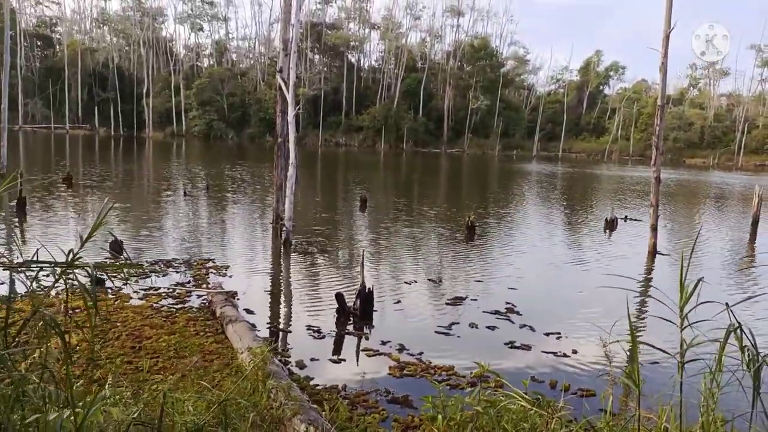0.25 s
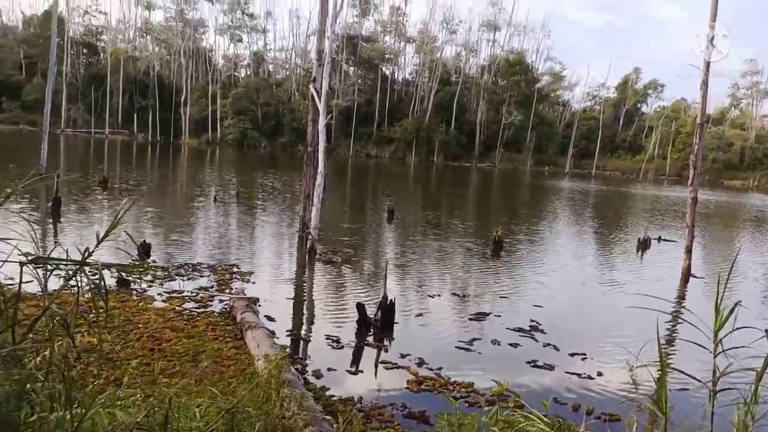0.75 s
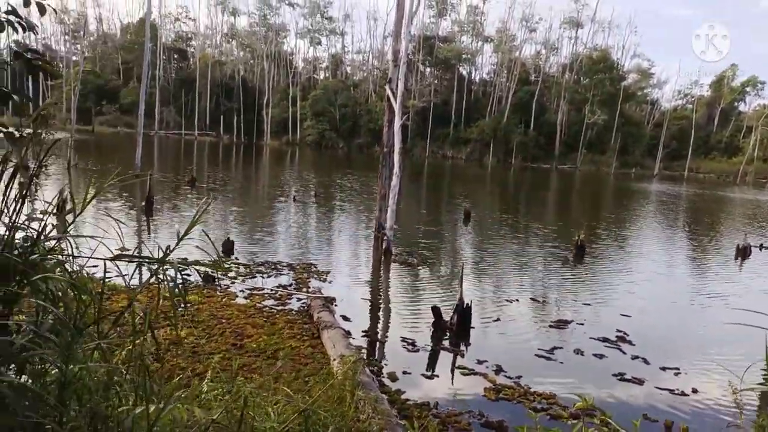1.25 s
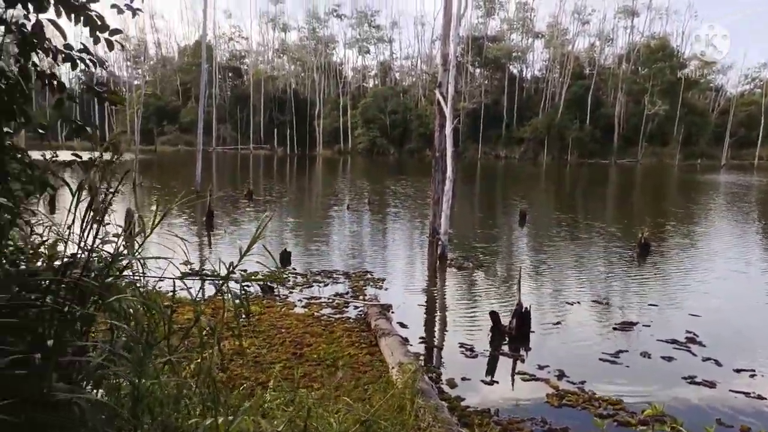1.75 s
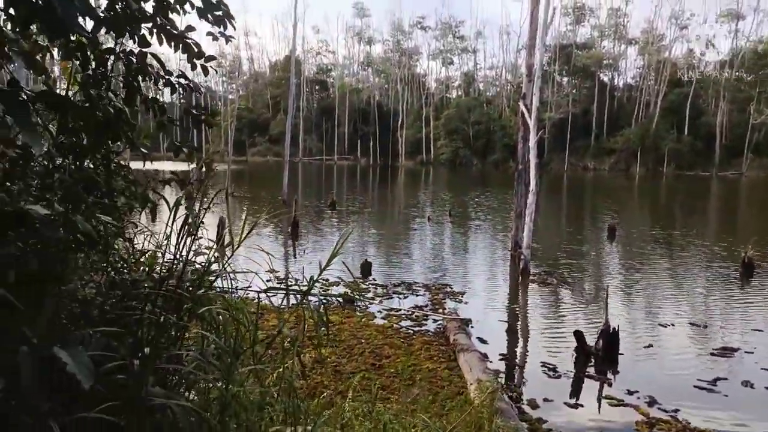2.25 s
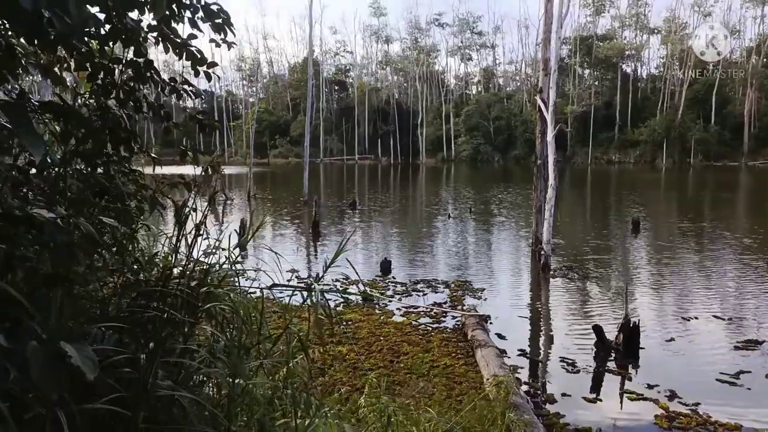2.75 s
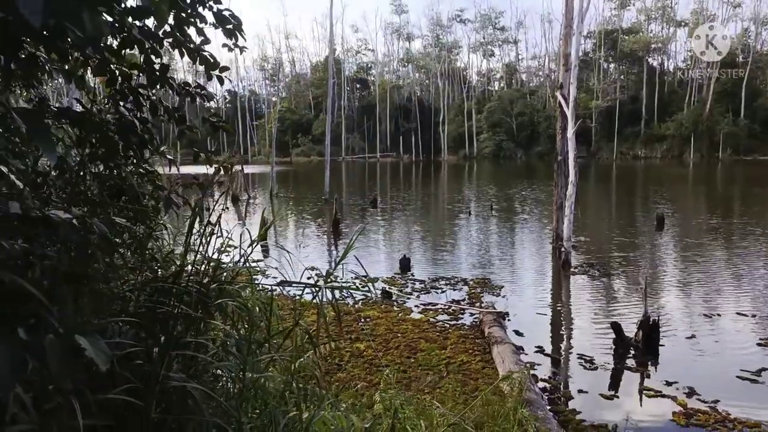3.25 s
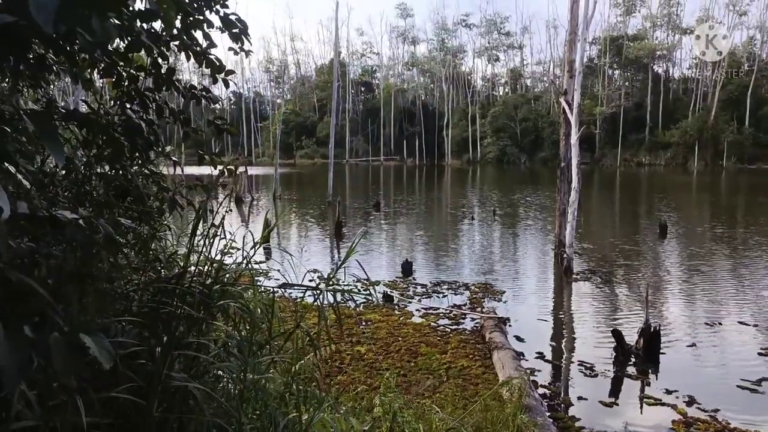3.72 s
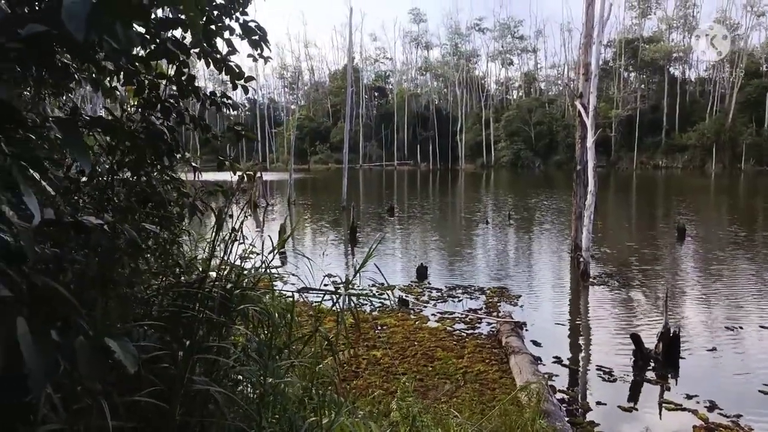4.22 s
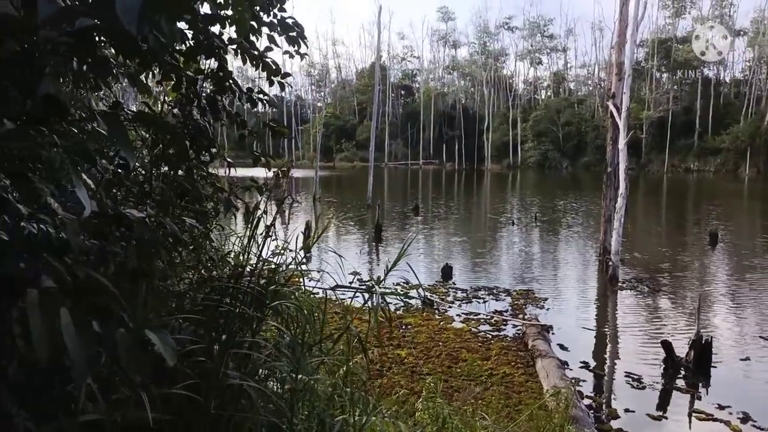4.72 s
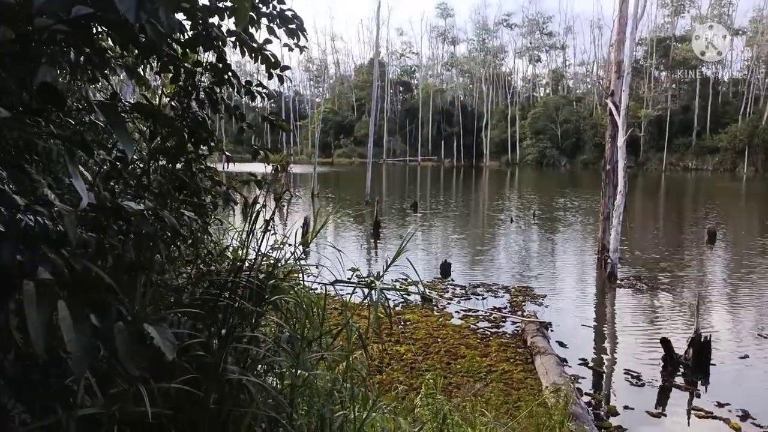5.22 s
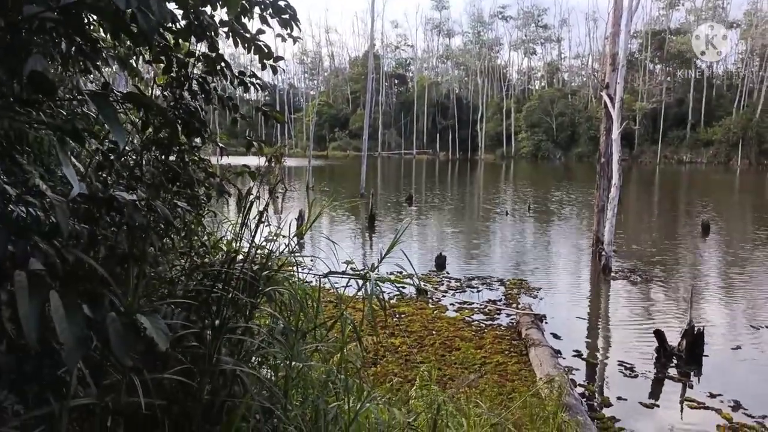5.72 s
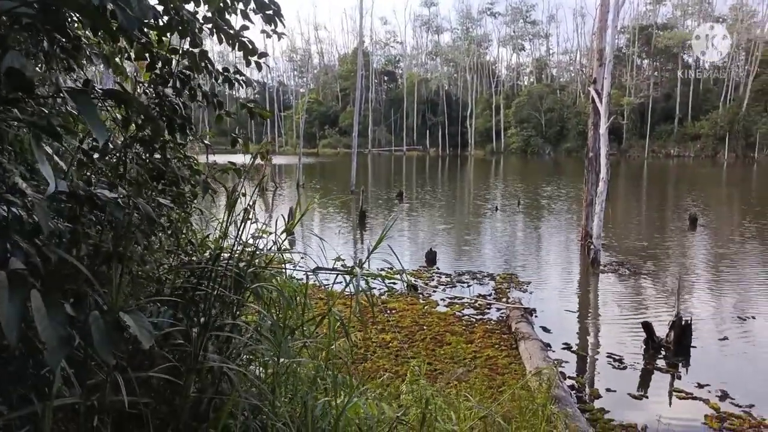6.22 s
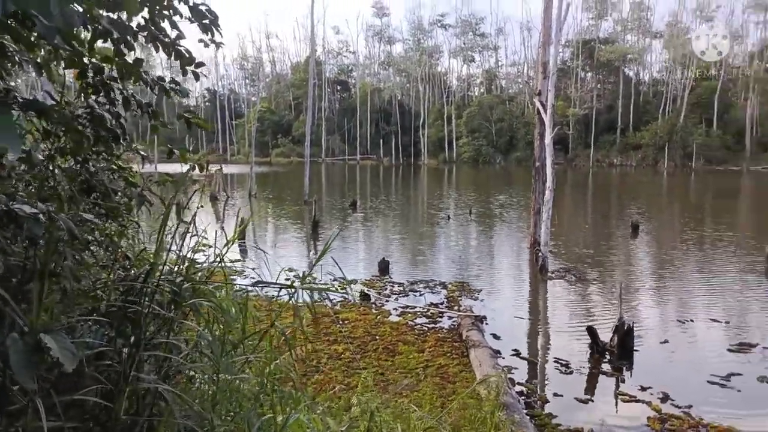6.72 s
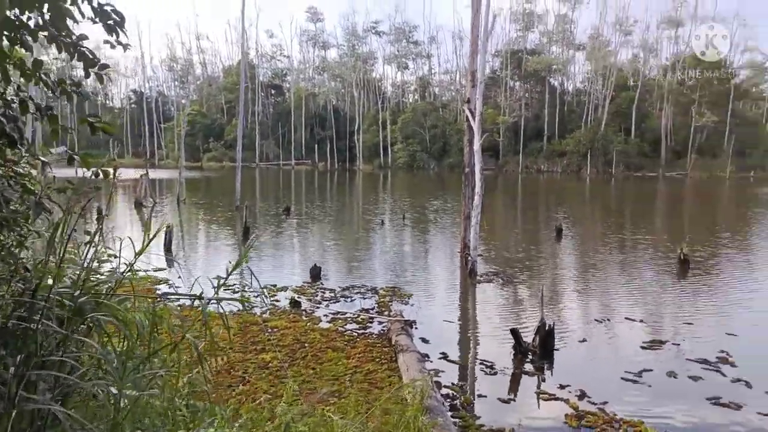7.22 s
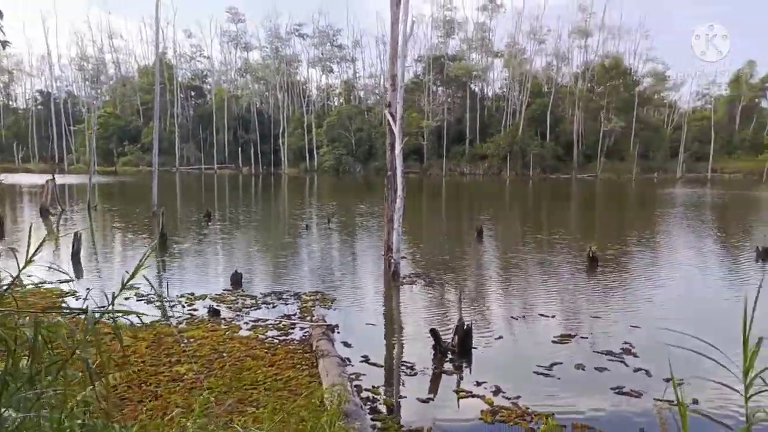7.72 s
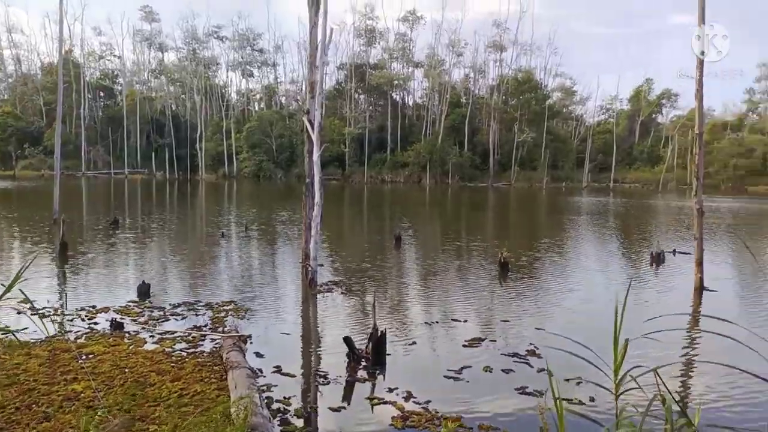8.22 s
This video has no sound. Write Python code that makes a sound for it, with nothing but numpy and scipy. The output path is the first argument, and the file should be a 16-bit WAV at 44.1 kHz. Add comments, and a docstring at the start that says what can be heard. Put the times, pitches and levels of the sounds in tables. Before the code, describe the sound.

A swamp forest at the water's edge, heard through one outdoor microphone. A dense insect chorus rings steadily around 8 kHz throughout, with a near cricket throbbing about twelve times a second, its strength wavering, and a thin raspy katydid above. From 0 to 3.6 s feet brush dry grass in crackling bursts, strongest around 1.2 to 1.5 s, with stems snapping at the start, near 1 s, 1.5 s, 2.2 s and sharply at 3.2 s; afterwards only faint touches until 5 s. A brighter trill swells until about 2 s and returns from 7 to 8.4 s. Distant birds give short whistles, falling chirps and hoarse calls, busy near 2.5, 3.1, 5 and 5.9 s, then 7.6 s, echoing among trunks. Soft frog pips recur from 1.9 s. Forest hiss lies beneath, and a wavering 100 Hz hum grows after 7 s, booming near 7.75 and 8.4 s with light wind rumble.

```python
"""A swamp forest by still water. A near cricket throbs over a steady chorus of other insects.
Distant birds call, a frog pips, feet brush dry grass and snap stems, and a low hum wavers under light wind.
Insects are pulsed tones and noise ringing wings; birds and frog are gliding tones, echoed by the trees.
Grass is clumped cracks, stems are struck resonances, and air and wind are filtered noise."""
import sys
import numpy as np
from scipy import signal
from scipy.fft import rfft, irfft, next_fast_len
from scipy.io import wavfile
from scipy.ndimage import uniform_filter1d

SR = 44100
rng = np.random.default_rng(int(sys.argv[2]) if len(sys.argv) > 2 else 0)


def wrap_up_sound(samples):
    """Save the sound to the file named by the first command line argument, as 16-bit audio."""
    columns = np.atleast_2d(samples).T
    # keep every value between -1 and 1, then stretch to whole-number steps
    tamed = np.clip(columns, -1, 1)
    steps = np.round(tamed * 32767).astype(np.int16)
    wavfile.write(sys.argv[1], SR, steps)


def boost(x):
    """Linear amplitude factor 10**(x/20) for a level x in decibels (scalar or array-like)."""
    u = np.asarray(x, float) / 20
    return 10 ** u


N = 373086   # length in samples


def rms_one(x):
    """Scale to rms 1."""
    return x / np.sqrt(np.mean(x ** 2) + 1e-20)


def noise():
    """White noise as long as the scene."""
    return rng.standard_normal(N)


def in_time(rows):
    """Join each column by straight lines, one value a sample."""
    s, *columns = np.transpose(rows)
    return [np.interp(np.arange(N) / SR, s, c) for c in columns]


def bouts(rows, rise_db, fall_db, arch_db=0.0):
    """Rows rise, hold as an arch and fall (slopes in dB per s); gives the loudest row's dB and further columns."""
    start, length, level_db, *more = np.transpose(rows)[:, :, None]
    t = np.arange(0, N / SR + .002, .001)   # one value a millisecond
    along = np.clip(2 * (t - start) / length - 1, -1, 1)
    before = np.maximum(start - t, 0)
    after = np.maximum(t - start - length, 0)
    db = level_db - arch_db * along ** 2 - rise_db * before - fall_db * after
    top = db.argmax(axis=0)
    curves = [db.max(axis=0)] + [column[top, 0] for column in more]
    return [np.interp(np.arange(N) / SR, t, curve) for curve in curves]


def drift(rate):
    """Slow random wandering, spread 1; a higher rate (Hz) wanders faster."""
    r = np.exp(-80 * np.pi * rate / SR)   # worked out once every 40 samples
    slow = signal.lfilter([1], [1, -2 * r, r * r], rng.standard_normal(N // 40 + 2002))[2000:]
    return np.interp(np.arange(N) / 40, np.arange(len(slow)), rms_one(slow - slow.mean()))


def tone(hz):
    """A sine that follows a pitch curve."""
    return np.sin(2 * np.pi * np.cumsum(hz) / SR)


def coloured(x, points):
    """Shape a spectrum by (Hz, dB) points; rms 1."""
    hz, db = np.transpose(points)
    size = next_fast_len(N)
    grid = np.maximum(np.fft.rfftfreq(size, 1 / SR), 1)
    gain = boost(np.interp(np.log(grid), np.log(hz), db, right=-90))
    return rms_one(irfft(rfft(x, size) * gain, size)[:N])


def resonate(x, hz, width_hz):
    """Pass twice through one resonance; the width is that of a single pass."""
    r = np.exp(-np.pi * width_hz / SR)
    section = [(1 - r * r) / 2, 0, (r * r - 1) / 2, 1, -2 * r * np.cos(2 * np.pi * hz / SR), r * r]
    return signal.sosfilt([section, section], x + 1e-18)


def cut(x, kind, hz, order=4):
    """Butterworth edge or band."""
    return signal.sosfilt(signal.butter(order, hz, kind, fs=SR, output="sos"), x)


def trees(x, t60, wet_db):
    """Scattering from trunks: a dying noise tail in which some trees answer louder than others."""
    t = np.arange(SR // 2) / SR
    clumps = boost(2.5 * np.repeat(rng.standard_normal(len(t) // 300 + 1), 300)[:len(t)])
    onset = 1 - np.exp(-t / 0.0004)
    tail = rng.standard_normal(len(t)) * clumps * boost(-60 * t / t60) * onset
    tail = tail / np.sqrt(np.sum(tail ** 2))
    return x + boost(wet_db) * signal.fftconvolve(x, tail)[:N]


# Tone colour of the far forest. Each row: frequency in Hz, relative level in dB per Hz.
AIR_COLOUR = [(100, -7), (140, -4.5), (200, -9.5), (420, -14.5), (500, -21), (1890, -24.5), (3590, -26.5),
              (4700, -32), (5190, -58), (6000, -79), (7800, -60)]
# Loudness of the far forest. Each row: time in seconds, level in dB.
AIR_LEVEL = [(0, -63.5), (5.3, -63.5), (7, -65.5), (8.46, -66)]


def forest_air():
    """Far forest hiss: noise shaped by frequency, its level slowly changing."""
    return boost(in_time(AIR_LEVEL)[0]) * coloured(noise(), AIR_COLOUR)


# Gusts on the microphone. Each row: start of the hold in seconds, its length in seconds, gain in dB.
GUSTS = [(0, 0.26, -60), (1.32, 0.018, -55), (1.83, 0.017, -49), (5.55, .02, -50.5), (5.72, 0.27, -58),
         (7.07, 0.018, -50.5), (7.7, .18, -48.5), (8.36, 0.12, -47)]
SWELL_DB_PER_S = 142   # rise and fall of gusts and of booms in the hum


def wind():
    """Lumpy rumble on the microphone: noise through a narrow low resonance, swelling in gusts."""
    calm_db = -64.5
    wind_db = np.maximum(calm_db, bouts(GUSTS, SWELL_DB_PER_S, SWELL_DB_PER_S)[0])
    return boost(wind_db) * rms_one(resonate(noise(), 71.8, 19))


# Usual strength of the hum. Each row: time in seconds, gain in dB.
HUM_LEVEL = [(0, -67), (1.2, -60.5), (1.9, -65.5), (3.5, -61), (5.45, -60.5), (6.0, -61), (6.9, -64.5),
             (7.2, -53), (8.46, -47.5)]
# The hum booms twice. Each row: start of the hold in seconds, its length in seconds, gain in dB.
BOOMS = [(7.74, 0.014, -34.5), (8.37, 0.018, -37)]


def hum():
    """A wavering low tone blended with narrow noise, plus a faint upper drone of narrow noise."""
    hum_db = np.maximum(in_time(HUM_LEVEL)[0], bouts(BOOMS, SWELL_DB_PER_S, SWELL_DB_PER_S)[0])
    steady = tone(101.5 + 1.705 * drift(4.0))
    rough = rms_one(resonate(noise(), 102.8, 15.8))
    drone = rms_one(resonate(noise(), 370, 45)) * boost(-78 + 2.5 * drift(1.2))
    return boost(hum_db) * (0.71 * steady + 0.67 * rough) + drone


def beat(per_s, depth, wander):
    """A gain that swells per_s times a second, slowly slipping in step."""
    turns = per_s * np.arange(N) / SR + wander * drift(0.63) + rng.random()
    return np.exp(2 * depth * (np.cos(2 * np.pi * turns) - 1))


def stridulate(hz, width_hz, pulses, pulse_depth, throbs, throb_depth):
    """Scraper noise rings a wing; it comes in pulses, grouped in throbs (both per second); rms 1."""
    scrape = noise() * beat(pulses, pulse_depth, wander=.4) * beat(throbs, throb_depth, wander=0.11)
    return rms_one(resonate(scrape, hz, width_hz))


# Each row is one steady singer: wing pitch in Hz, width of each resonance pass in Hz, pulses per second,
# pulse depth (no unit), throbs per second, throb depth (no unit), middle level in dB before the treble cut.
CHORUS = [(7872, 134, 50, 0.17, 4.8, 0.056, -43), (8183, 110, 180, 0.19, 16, 0.18, -45),
          (7960, 130, 100, 0.35, 16, 0.54, -69), (6665, 157, 70.4, 0.27, 17.6, 0.1, -61),
          (6922, 215, 120, 0.28, 16, 0.099, -60.5)]


def chorus():
    """Several insects ring their wings steadily, each level wavering a little."""
    return sum(boost(level_db + 0.85 * drift(4.0)) * stridulate(*song) for *song, level_db in CHORUS)


# Trill bouts at full voice. Each row: start in seconds, length in seconds, gain in dB.
TRILLS = [(1.3, 0.67, -44), (7.0, 1.387, -45.5)]


def trill():
    """A pulsed tone blended with wing noise; it creeps in, holds and stops short, with a faint rest level."""
    rest_db = -65.5
    trill_db = np.maximum(bouts(TRILLS, rise_db=6.5, fall_db=300)[0], rest_db)
    pulsed = rms_one(tone(8735 + 14 * drift(12.3)) * beat(140.5, 0.33, wander=.12))
    wing = stridulate(8625, 400, 140.5, 0.074, 4.5, 0.041)
    return boost(trill_db) * (0.53 * pulsed + 0.77 * wing)


# A katydid that drops away near the end. Each row: time in seconds, level in dB.
KATYDID_LEVEL = [(0, -61), (.5, -64), (1.4, -59.5), (3.0, -59), (4.4, -71.5), (6.2, -64.5), (7.86, -59.5),
                 (7.91, -80), (8.46, -75)]


def katydid():
    """A wide rasp: pulsed wing noise kept to a high band."""
    rasp = cut(stridulate(10020, 1600, 280, 0.13, 9.4, 0.17), "band", [9600, 10900])
    rasp = cut(rasp, "band", [9500, 11000])
    return boost(in_time(KATYDID_LEVEL)[0]) * rms_one(rasp)


def top_hiss():
    """A thin pulsed insect hiss at the very top."""
    hiss = cut(stridulate(13640, 2200, 65, .15, 5.5, 0.11), "band", [12300, 15400])
    return boost(-77.5) * rms_one(hiss)


def insects():
    """The chorus and trill with their top trimmed, then the katydid and the hiss."""
    wings = cut(cut(chorus() + trill(), "low", 11400), "low", 11900)
    return wings + katydid() + top_hiss()


def chatter(count):
    """Faint notes of many far birds, at random moments and pitches; columns as in the bird tables."""
    u = rng.random((count, 5))
    start = u[:, 0] * (N / SR - .2)
    length = .025 + .05 * u[:, 1]
    last_hz = 950 * 5 ** u[:, 2]
    first_hz = last_hz * (.9 + .35 * u[:, 3] ** 2)
    return np.column_stack([start, length, first_hz, last_hz, -84 + 8 * u[:, 4]])


def bird_note(length, first_hz, last_hz, hoarse):
    """A gliding tone, softer while it glides fast; hoarseness roughens the pitch and slows the glide."""
    t = np.arange(round(length * SR)) / SR
    wobble, ragged = uniform_filter1d(rng.standard_normal((2, len(t))), size=150) * np.sqrt(150)
    to_go = (first_hz - last_hz) * np.exp(-(4.5 - 2.0 * hoarse) * t / length)
    hz = (last_hz + to_go) * (1 + (0.0045 + 0.0844 * hoarse ** 2) * wobble)
    fade = np.minimum(t / .005, 1) * np.minimum((length - t) / .012, 1)
    return fade * boost(-.002 * np.abs(to_go) + 3.5 * ragged) * tone(hz)


# Clear whistles; the long steady row near 4.5 kHz at 2.724 s is an insect's whistle-like song. Each row: start
# in seconds, length in seconds, first pitch in Hz, # pitch it glides towards in Hz, gain in dB before glide
# softening and echoes.
WHISTLES = [(.28, 0.058, 3800, 3900, -61), (.392, 0.022, 1180, 3150, -47), (.405, 0.084, 3080, 3186, -53),
            (1.901, 0.28, 4600, 4330, -64.5), (2.001, 0.076, 1240, 1100, -68),
            (2.724, 0.34, 4470, 4380, -71.5), (2.78, 0.11, 3690, 3850, -70.5),
            (3.131, 0.044, 1990, 1750, -50.5), (3.182, 0.088, 1260, 1278, -61),
            (3.439, 0.065, 1320, 1274, -57.5), (3.71, 0.028, 2410, 2160, -60.5),
            (3.895, 0.067, 3730, 3740, -63), (4.035, 0.058, 3780, 3710, -67),
            (4.614, 0.057, 3970, 3177, -60), (4.933, 0.096, 6200, 3237, -50),
            (5.486, 0.016, 1990, 1990, -64), (5.507, 0.045, 2840, 2720, -68), (5.6, 0.07, 2790, 2783, -71),
            (5.727, 0.054, 3690, 3730, -64), (5.78, 0.14, 4950, 4500, -66.5),
            (5.812, 0.15, 3400, 3080, -58.5), (6.116, 0.097, 3740, 3750, -62.5),
            (6.345, 0.046, 2770, 2780, -65.5), (6.375, 0.04, 2820, 2026, -62.5),
            (6.68, 0.071, 3490, 3520, -75), (6.742, 0.02, 1700, 2060, -63.5),
            (6.851, 0.029, 1770, 2060, -62.5), (6.957, 0.028, 1700, 2100, -63.5),
            (7.063, 0.034, 1730, 1940, -69), (7.24, 0.027, 960, 1033, -68.5),
            (7.284, 0.11, 1306, 1257, -61), (7.578, 0.16, 5700, 2970, -54), (7.699, 0.15, 4010, 3200, -62),
            (7.864, 0.037, 1270, 1220, -69.5), (7.902, 0.1, 3600, 4580, -65.5),
            (7.95, 0.079, 4560, 4450, -69), (8.004, 0.09, 3970, 3800, -74), (8.14, 0.08, 4400, 4490, -72)]
# Hoarse calls. Each row: start in seconds, length in seconds, first pitch in Hz,
# pitch it glides towards in Hz, gain in dB before glide softening and echoes.
RASPS = [(.425, 0.028, 1790, 1660, -60), (2.52, .09, 3700, 2690, -61), (5.625, 0.067, 5300, 4380, -72.5),
         (5.746, 0.046, 5460, 5850, -74.5), (7.06, .06, 4720, 3620, -75), (2.462, 0.091, 4300, 3400, -53.5),
         (2.578, 0.097, 3290, 1970, -62), (2.915, 0.068, 2276, 1830, -56), (5.119, 0.082, 410, 354, -61),
         (5.24, 0.059, 318, 354.5, -58.5), (5.865, 0.072, 4300, 3630, -60), (5.922, .12, 2930, 1955, -70.5),
         (5.944, 0.085, 4150, 3400, -54), (6.032, 0.11, 2920, 2764, -62.5)]


def birds():
    """Clear whistles (one long steady one near 4.5 kHz is an insect), hoarse calls and far chatter, with their
    echoes off the trees."""
    out = np.zeros(N)
    # hoarseness runs from 0 to 1
    for notes, hoarse in [(WHISTLES, .08), (RASPS, 0.74), (chatter(count=110), 0.4)]:
        for s, length, first_hz, last_hz, level_db in notes:
            note = bird_note(length, first_hz, last_hz, hoarse)
            i = round(s * SR)
            out[i:i + len(note)] += boost(level_db) * note
    return trees(out, t60=0.36, wet_db=4.5)


# Frog pips. Each row: start in seconds, level in dB before a shared trim and the echoes.
FROG_PIPS = [(1.908, -52), (2.538, -59), (4.138, -58.5), (4.638, -60), (5.11, -68), (5.739, -57),
             (6.235, -59.5), (6.702, -60), (7.322, -56), (7.815, -63), (8.29, -58)]


def frog():
    """Short rounded pips that fall in pitch, echoed by the trees."""
    out, t = np.zeros(N), np.arange(SR // 20) / SR
    pip = tone(820 - 4000 * t) * np.sin(20 * np.pi * t) ** 0.33
    for s, level_db in FROG_PIPS:
        i = round(s * SR)
        out[i:i + len(t)] += boost(level_db - 8.5) * pip
    return trees(out, t60=.3, wet_db=2.5)


# Tone colour of dry blades. Each row: frequency in Hz, relative level in dB per Hz.
GRASS_COLOUR = [(300, -25), (450, -27.5), (700, -12), (1050, 2.5), (1800, -1), (3700, 0.5), (4700, -7),
                (6000, -22), (8000, -37.5), (10800, -6), (13000, -20), (15500, -29)]
# Feet brush the grass. Each row: start in seconds, length in seconds, level in dB before a shared lift,
# treble level in dB against the rustle, before a shared treble lift.
RUSTLES = [(0, 0.29, -41, -8), (.39, 0.027, -47, -13), (.72, 0.074, -66, -11), (.91, 0.065, -40.5, -3),
           (.97, 0.094, -44.5, -5), (1.09, 0.13, -49.5, -7), (1.185, 0.35, -34.5, -8.5),
           (1.62, .13, -63, 1), (1.99, 0.22, -55, -1), (2.125, 0.16, -41, -5), (2.31, .14, -48, -12.5),
           (2.78, 0.012, -58.5, -4), (3.105, 0.023, -50.5, -8), (3.18, 0.068, -52, -8),
           (3.3, 0.023, -46, -4.5), (3.36, 0.15, -55.5, -4.5), (3.475, 0.11, -44, -3),
           (3.8, 0.044, -58.5, -4), (4.23, 0.045, -63, -9), (4.975, 0.019, -67, 5)]


def grass():
    """Clumped cracks of dry blades, patchy from band to band; louder treads add lows, bright ones treble."""
    rustle_db, bright_db = bouts(RUSTLES, rise_db=443, fall_db=310, arch_db=3)
    sizes = boost(4.0 * np.minimum(rng.exponential(1, N), 5)) * rng.choice([-1, 1], N)
    cracks_per_s = 4000 * boost(3.5 * drift(30))
    cracks = sizes * (rng.random(N) < cracks_per_s / SR)
    blades = coloured(rms_one(cracks) + 0.69 * noise(), GRASS_COLOUR)
    out, edges = 0, np.geomspace(400, 15600, num=12)
    for low, high in zip(edges, edges[1:]):
        lift_db = 0
        if low > 5000:
            lift_db = bright_db + 12.0
        elif high < 900:
            lift_db = .5 * (rustle_db + 47.5) + 0.5
        patch = boost(lift_db + 1.4 * drift(14))
        out = out + patch * cut(blades, "band", [low, high], order=2)
    return boost(rustle_db + 5.5) * out


# Ringing pitches of a stem. Each row: frequency in Hz, relative level in dB, time to fade by 60 dB in seconds.
STEM_MODES = [(1100, 9, 0.034), (1510, 16, 0.014), (2470, -22, 0.0096), (3400, 3.5, 0.0099),
              (4300, -3, 0.0094), (5700, -22, 0.0035), (10900, -31, 0.0048)]
# Breaking stems. Each row: time in seconds, strength in dB before a shared trim,
# brightness in dB per octave, tilting the modes around 2000 Hz.
SNAPS = [(0.015, -32.5, 14), (0.258, -26.5, 8), (0.93, -38.5, -18), (0.944, -28.5, 1), (0.971, -35, 8),
         (1.027, -28.5, 7.5), (1.515, -28.5, -1), (2.128, -31.5, 21), (2.247, -29.5, 11),
         (2.428, -39, 19.5), (3.176, -21.5, 10), (3.306, -49, 23), (4.254, -52.5, -12)]


def snaps():
    """Each break strikes the stem modes with strengths of its own; each mode rings and dies away."""
    at, strength_db, bright_db = np.transpose(SNAPS)
    out, luck_db = np.zeros(N), rng.normal(0, 2.5, (len(at), len(STEM_MODES)))
    for k, (hz, level_db, t60) in enumerate(STEM_MODES):
        tilt_db = bright_db * np.log2(hz / 2000)
        clicks = np.zeros(N)
        clicks[np.round(at * SR).astype(int)] = boost(strength_db + level_db - 13.5 + tilt_db + luck_db[:, k])
        r, w = boost(-60 / (t60 * SR)), 2 * np.pi * hz / SR
        out += signal.lfilter([0, np.sin(w)], [1, -2 * r * np.cos(w), r * r], clicks + 1e-18)
    return trees(cut(out, "high", 800), t60=.1, wet_db=-10)


def stroke(turns, place, share, hz, blur_hz, pulses, depth):
    """One wing stroke a turn: a short tone that flutters with the pulse rate, at a strength of its own; rms 1."""
    t = np.arange(N) / SR
    count = np.floor(turns - place + .5)
    within = (turns - place - count) / share
    strength = boost(1.2 * rng.standard_normal(400)[count.astype(int) + 2])
    sagging = tone(hz + blur_hz * drift(16) - 25 * within)   # pitch sags through the stroke
    flutter = 1 + depth * np.cos(2 * np.pi * pulses * t + 3 * drift(2.12))
    return rms_one(np.exp(-within ** 4) * strength * flutter * sagging)


# The near cricket. Each row: time in seconds, lateness of the chirp in milliseconds,
# main stroke level in dB before the echoes.
CRICKET = [(0, -9.5, -46), (1.2, 1, -40), (1.8, 2, -49.5), (2.2, 15, -52), (2.6, 5.5, -43.5),
           (3.68, 2.5, -41.5), (3.78, 0, -50.5), (4.1, 11.5, -45.5), (4.4, 2, -40.5), (5.4, 0, -40),
           (6.0, 6, -45), (6.6, 1.5, -40.5), (7.0, 8.5, -44.5), (7.45, 12.5, -40.5), (8.46, 1, -58)]


def cricket():
    """A loud stroke, then a lower back stroke half a turn later, with short echoes off the trees."""
    chirps_per_s = 12.35
    late_ms, main_db = in_time(CRICKET)
    turns = chirps_per_s * (np.arange(N) / SR - late_ms / 1000)
    main = stroke(turns, place=.001, share=.16, hz=8045, blur_hz=10, pulses=172, depth=.55)
    back = stroke(turns, place=.52, share=.18, hz=7865, blur_hz=30, pulses=335, depth=.5)
    return trees(boost(main_db) * (main + boost(-7) * back), t60=.12, wet_db=-11)


def scene():
    """All sources summed on one microphone."""
    background = forest_air() + wind() + hum()
    animals = insects() + birds() + frog() + cricket()
    feet = grass() + snaps()
    return (background + animals + feet)[None]


def top_cut(x):
    """Nothing passes above the cut-off."""
    return signal.sosfilt(signal.butter(12, 15630, fs=SR, output="sos"), x)


def record(dry):
    """Turns the dry scene into the finished sound."""
    return top_cut(dry)


dry = scene()
out = record(dry)
wrap_up_sound(out)
```